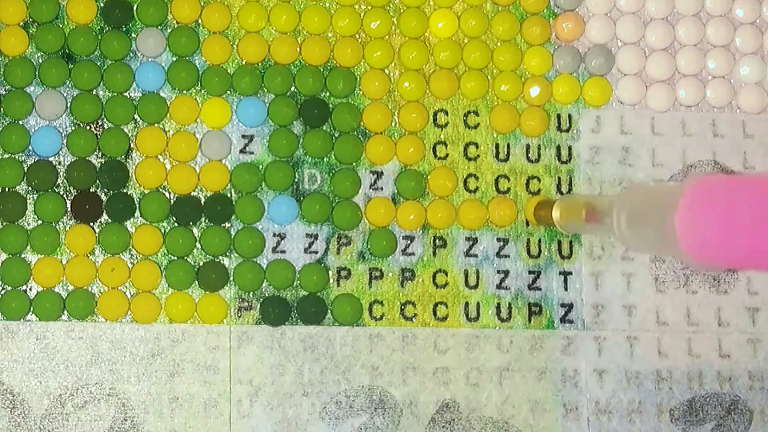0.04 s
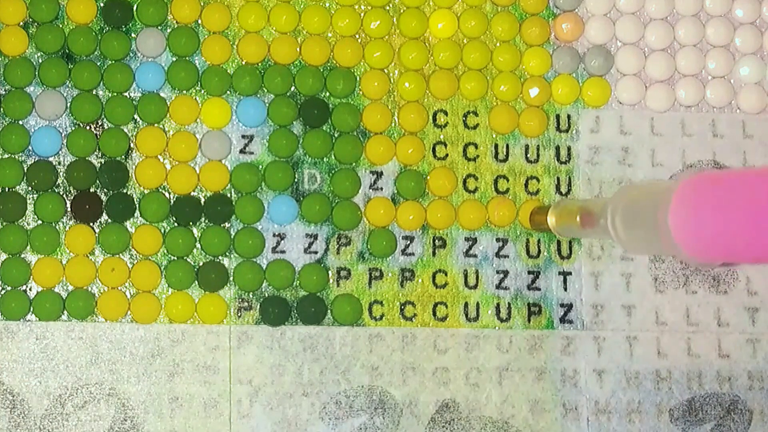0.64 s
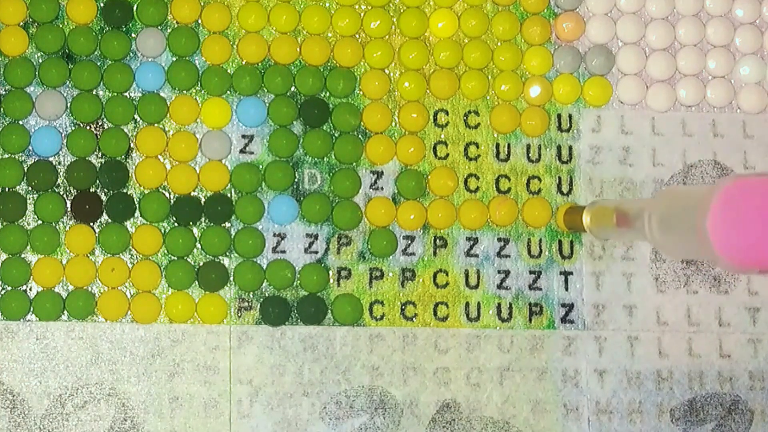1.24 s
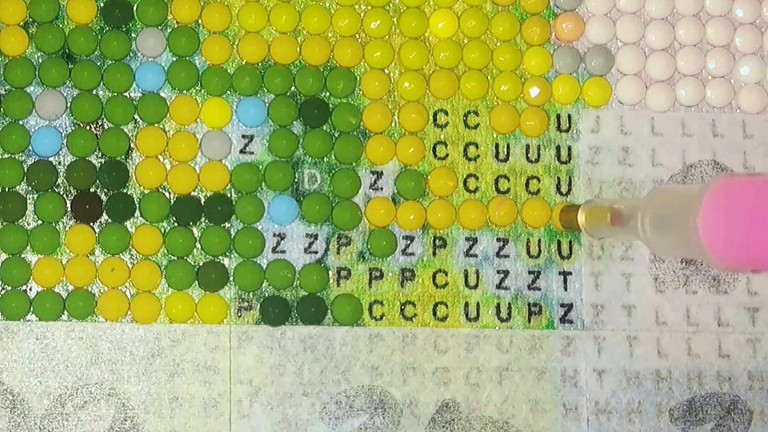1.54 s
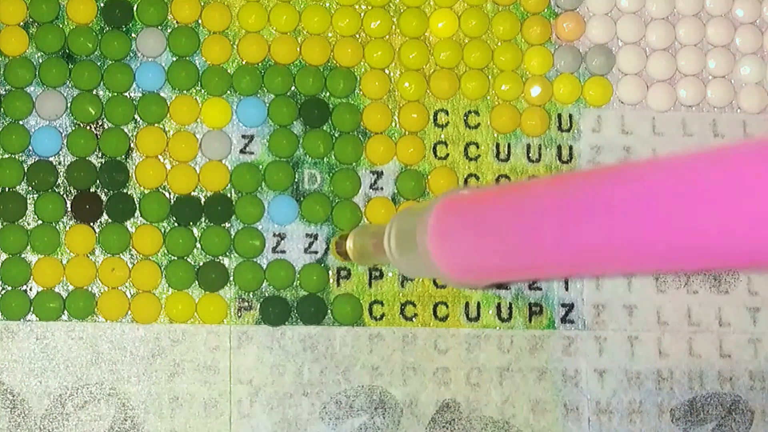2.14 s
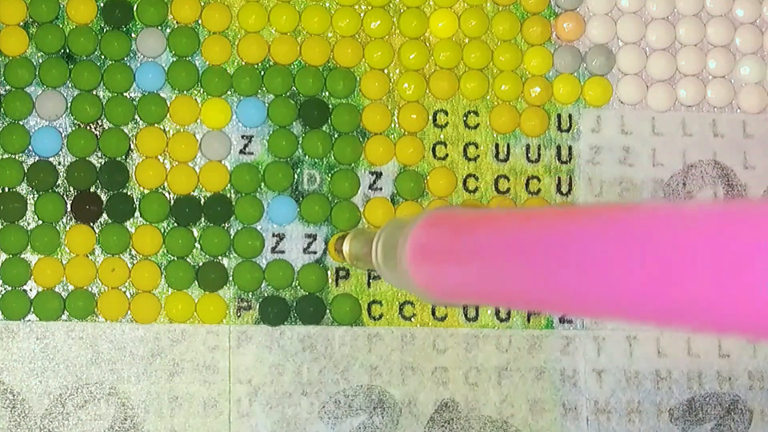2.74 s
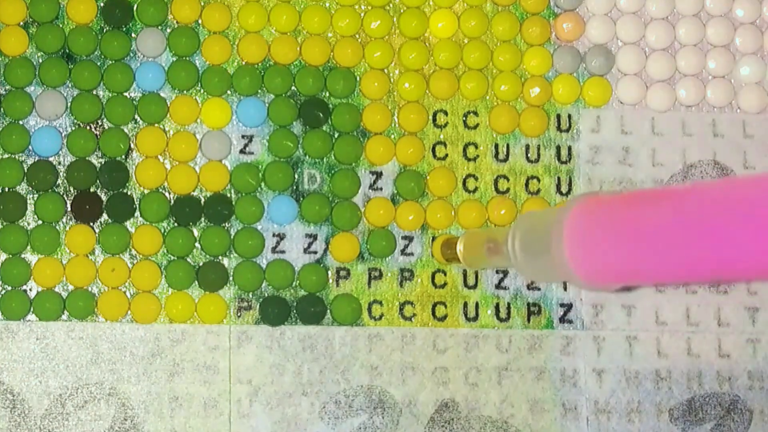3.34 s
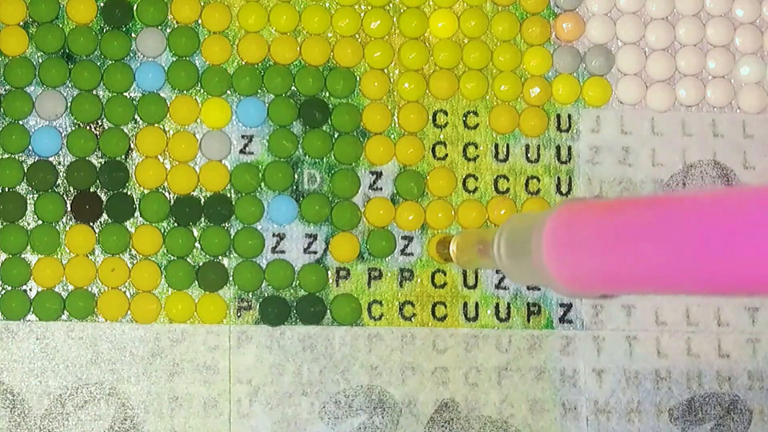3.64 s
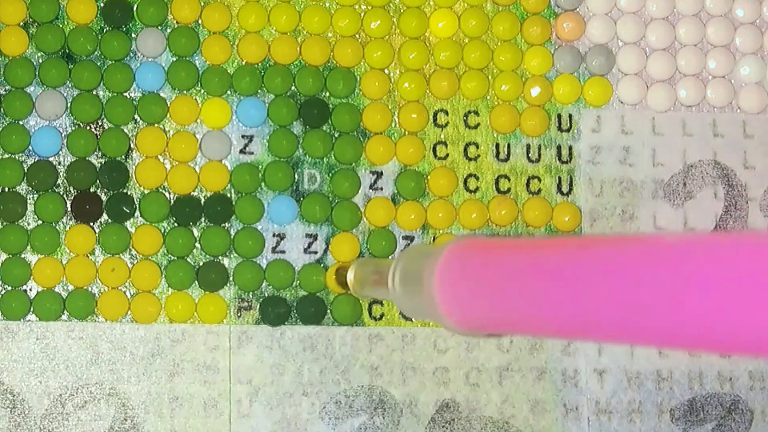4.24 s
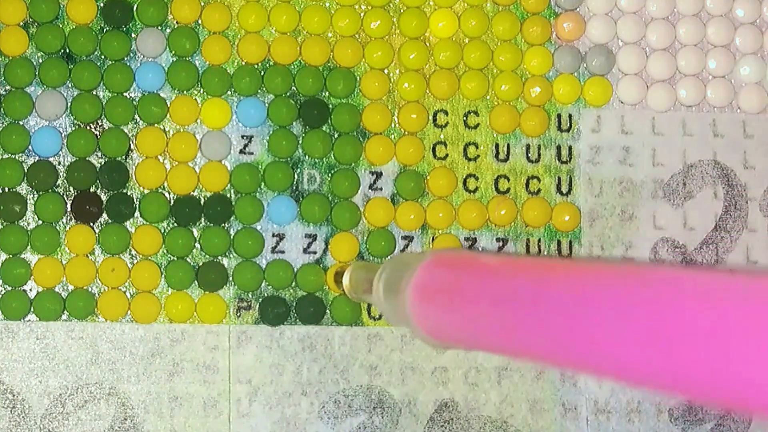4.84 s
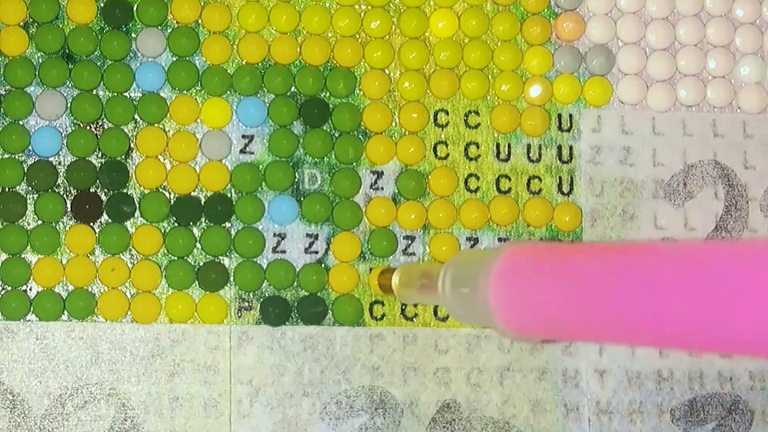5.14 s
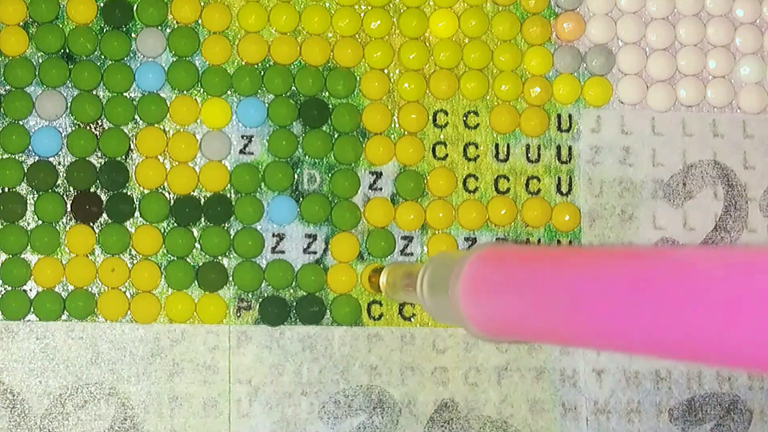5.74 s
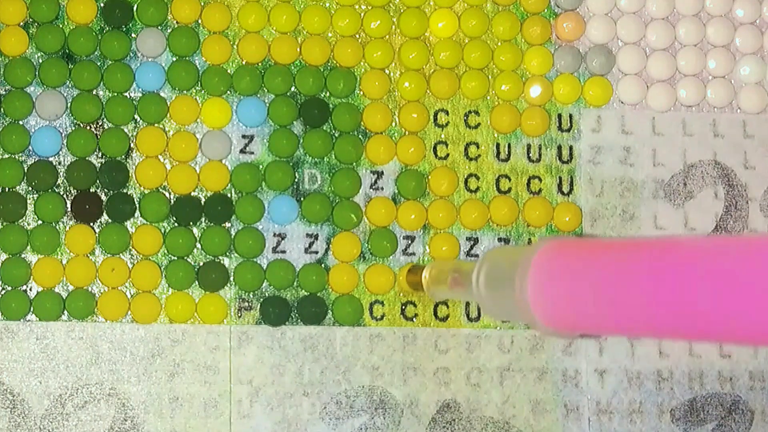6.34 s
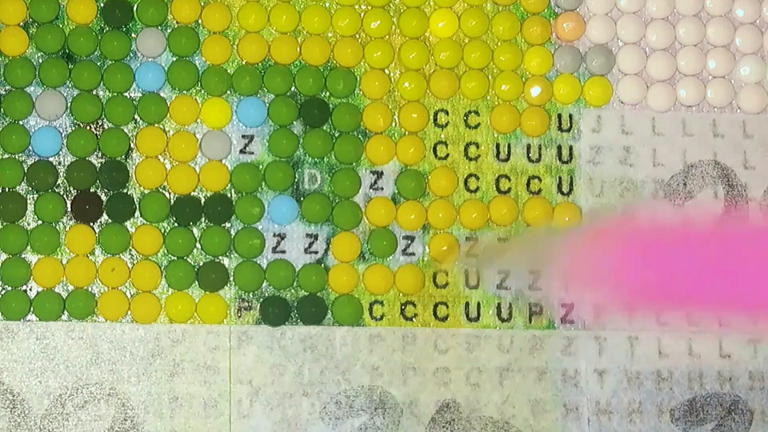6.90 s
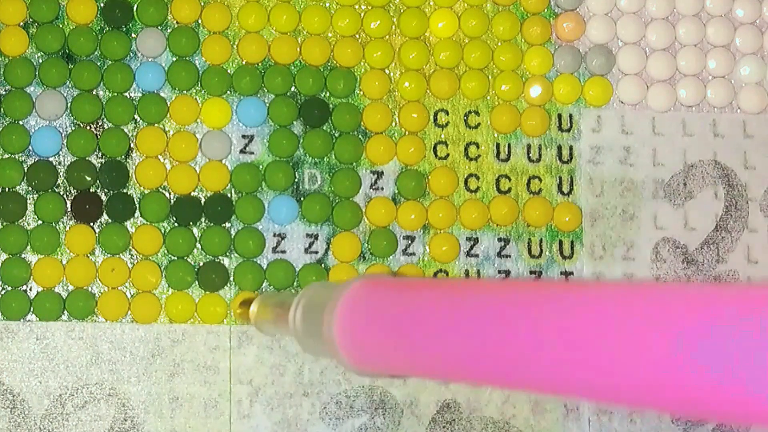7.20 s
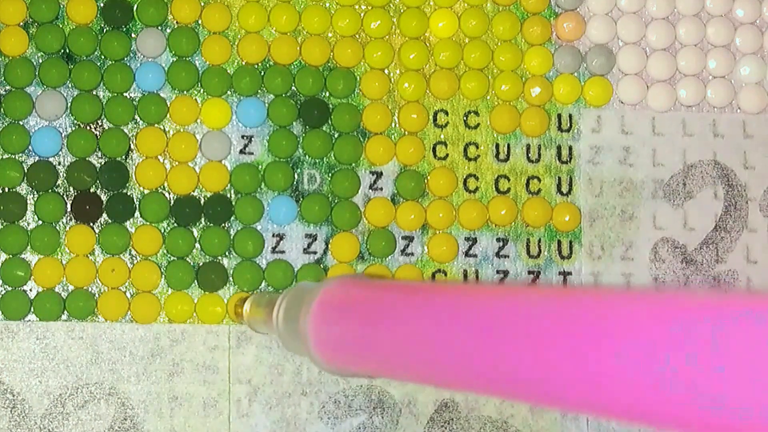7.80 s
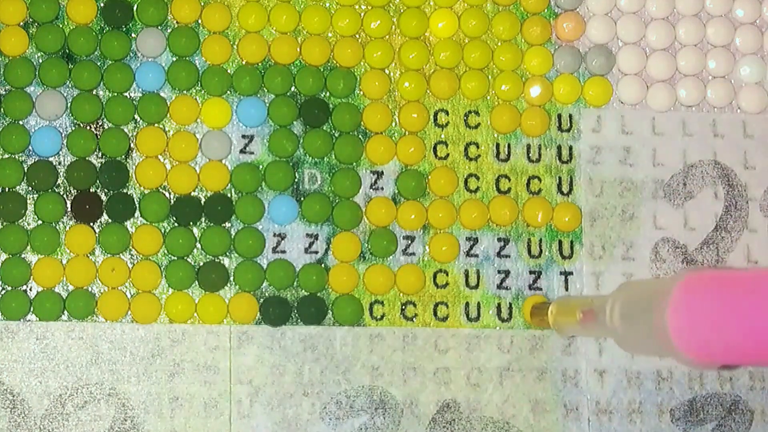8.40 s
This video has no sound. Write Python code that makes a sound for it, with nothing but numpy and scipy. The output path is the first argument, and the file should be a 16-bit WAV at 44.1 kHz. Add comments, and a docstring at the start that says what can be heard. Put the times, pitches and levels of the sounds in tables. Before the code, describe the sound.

Close to the microphone in a small room, a pen presses tiny resin beads onto a sticky canvas. Eight sharp, thin snaps come one a second, from about 0.7 to 7.7 seconds, each ringing very briefly. The first is soft, the second is the loudest, and the last four are firm and even. A hand faintly rubs the canvas around 3 seconds. A small motor whines at a high pitch throughout, over hiss and muffled traffic that swells near 1.6 and 5 seconds. An idling engine throbs outside, loud until 2 seconds, then abruptly much quieter. From 5 seconds a more distant engine hums low, fading near the end at about 8.5 seconds. The background steps in level several times, with soft pops near 1, 2 and 6 seconds, and swells around 7 seconds. Very faint far-off squeals and drones come and go.

```python
"""Sharp little snaps, one a second, sound close by in a small room: a pen presses tiny resin beads onto
a sticky canvas, and each rings briefly as it seats. A small motor whines near 3 kHz over hiss and the
muffled sound of passing traffic. The scene jumps between short shots, each with its own background level:
an engine throbs outside, loudly in the first two, and a more distant one hums through the last ones."""
import sys
import numpy as np
from scipy import signal
from scipy.fft import rfft, irfft
from scipy.io import wavfile

SR = 44100
rng = np.random.default_rng(int(sys.argv[2]) if len(sys.argv) > 2 else 0)


def dump(signal):
    """Clip the signal to [-1, 1] and save it as 16-bit WAV at the path in sys.argv[1]."""
    limited = np.clip(np.atleast_2d(signal).T, -1, 1)
    pcm = np.round(limited * 32767).astype(np.int16)
    wavfile.write(sys.argv[1], SR, pcm)


N = 381906
TIME = np.arange(N) / SR

# beads seating: (time [s], level [dB], low modes [dB], main ring [dB], middle modes [dB], bright modes [dB])
BEAD_SNAPS = [(0.6842, -24, 0, 0.5, 7.5, -8), (1.7187, -4, -3, 2.5, 2, -4),
              (2.7099, -17, -6, -6, -0.5, 1.5), (3.7332, -15.5, -7, 0.5, -2.5, 5.5),
              (4.7212, -10, -4, -2.5, -4.5, -2.5), (5.752, -10, 3, -6, -0.5, -0.5),
              (6.7204, -9.5, 4.5, -4.5, 2, 4), (7.7215, -8.5, 5.5, -5.5, -0.5, -1.5)]
# modes that ring in each snap: (frequency [Hz], level [dB], time to decay by 60 dB [s])
SNAP_MODES = [(2320, -23.5, 0.017), (2670, -15.5, 0.018), (3120, 3.5, 0.006), (4080, -13, 0.0085),
              (4680, -12.5, 0.0067), (5250, -14.5, 0.0061), (6600, -10, 0.0038), (7770, -10.5, 0.0048),
              (8900, -16, 0.0036)]
# dips where the modes cancel: (frequency [Hz], width [Hz])
ANTIRESONANCES = [(1540, 320), (3750, 180)]
# the hand on the canvas: (time [s], level [dB], centre frequency [Hz], time constant [s])
CANVAS_TOUCHES = [(1.737, -41, 8500, 0.00076), (2.782, -55, 2600, 0.02), (2.847, -62, 7500, 0.013),
                  (2.965, -57, 2230, 0.022), (3.08, -61, 4500, 0.017), (3.074, -64, 8000, 0.014),
                  (7.082, -45, 3300, 0.0021)]
# the motor's tone and sidebands: (offset from the tone [multiples of the turn rate], level [dB])
MOTOR_SIDEBANDS = [(-5, -23), (-3, -19), (-2, -11), (-1, -3), (0, 0), (1, -5), (2, -11), (3, -13), (4, -17),
                   (5, -18)]
# stretches of the near engine: (start [s], end [s], boom [dB], initial overtones [dB], their rise [dB/s])
ENGINE_STRETCHES = [(0, 0.984, -29, -39, 8), (0.986, 1.996, -29, -32.5, 1.3),
                    (1.993, 5.052, -54.5, -61.5, 1)]
# its harmonics before and after the first jump: (order [multiple of the cycle rate], level [dB])
EARLY_ORDERS = [(1, -25), (2, -34), (3, -38), (4, -12), (5, 1), (6, 2.5), (7, -11), (8, -16), (9, -16.5),
                (10, -12.5), (11, -10.5), (12, -6.5), (13, -32), (14, -22.5), (15, -30), (16, -23.5),
                (17, -17.5), (18, -22.5), (19, -29), (20, -28.5)]
LATE_ORDERS = [(1, -41), (2, -32), (3, -33), (4, -13.5), (5, -1), (6, -0.5), (7, -6.5), (8, -4), (9, 0),
               (10, -6), (11, -4.5), (12, -3.5), (13, -10), (14, -29), (15, -20.5), (16, -36), (17, -18),
               (18, -13.5), (19, -33), (20, -23.5)]
# combustion noise between the orders: (frequency [Hz], spectral density [dB])
COMBUSTION_SPECTRUM = [(10, -12), (45, -8), (100, -3), (220, 0.5), (330, -1.5), (500, -19), (1200, -49),
                       (4000, -70)]
# steady hiss: (frequency [Hz], spectral density [dB])
HISS_SPECTRUM = [(600, -9.5), (1500, -4), (2400, -6.5), (2800, 0), (3130, 9), (3500, -1), (4300, -9),
                 (5250, -7), (5900, -12.5), (7150, 2.5), (7700, -2), (8300, 0), (9700, -16.5), (12000, -19),
                 (15500, -19)]
# tyre noise: (frequency [Hz], spectral density [dB])
TYRE_SPECTRUM = [(100, 4.5), (250, -3), (400, 5.5), (700, 2.5), (1100, -4), (1800, -10.5), (3500, -13.5),
                 (8000, -38)]
# rumble through the walls: (frequency [Hz], spectral density [dB])
RUMBLE_SPECTRUM = [(10, -26), (25, -20), (45, -42), (70, -12.5), (110, -0.5), (170, 2), (230, -6.5),
                   (330, -9.5), (600, -22.5), (1500, -56)]
# vehicles: (time of closest approach [s], time to fall by 3 dB [s], level over the steady traffic [dB])
VEHICLE_PASSES = [(1.62, 0.27, 6), (5.15, 0.96, 6.5)]
# far squeals and drones: (start [s], duration [s], frequency [Hz], level [dB])
FAR_TONES = [(2.8, 1.35, 183, -53.5), (4.0, .45, 810, -67), (5.06, .35, 585, -58), (5.55, .45, 266, -51),
             (6.08, .9, 468, -61), (6.38, .42, 1705, -63), (8.45, .13, 1950, -70)]
# soft pops on some jumps between shots: (time [s], level [dB], time constant [s])
JUMP_POPS = [(0.9883, -23, 0.00051), (1.996, -29, 0.00089), (6.05, -35.5, 0.00023)]
# background level of each shot: (start [s], level [dB])
SHOT_LEVELS = [(0, -0.5), (1.996, -8), (3.02, -6.5), (5.058, -2), (6.055, -8)]


def bead_snaps(low_hz=1400, high_hz=9300):
    """Free vibration: a bead slips past its neighbours and rings; how it seats weights its damped modes."""
    out, t = np.zeros(N), np.arange(2048) / SR
    hz, db, t60 = np.transpose(SNAP_MODES)
    decays = np.exp(-np.log(1000) * np.outer(1 / t60, t))
    tunings = 1 + .015 * rng.standard_normal((len(BEAD_SNAPS), len(hz)))
    scrapes = rng.standard_normal((len(BEAD_SNAPS), len(t)))
    family = np.digitize(hz, [2800, 3600, 5900])  # low, main, middle, bright
    # the snap is thin, with little bass and a steep roll-off above 9 kHz
    bass_cut = signal.butter(4, low_hz, "high", fs=SR, output="sos")
    top_cut = signal.butter(8, min(high_hz, 15000), fs=SR, output="sos")
    # the canvas and the table under it answer with a faint thud
    thud = sum(undb(gain_db) * np.sin(2 * np.pi * mode_hz * t) * np.exp(-t / decay_s)
               for mode_hz, gain_db, decay_s in
               [(324, -20.5, 0.0029), (517, -30.5, 0.0033), (1090, -16.5, 0.00035)])
    for (s, level_db, *family_db), tuning, scrape in zip(BEAD_SNAPS, tunings, scrapes):
        gains = undb(db + np.array(family_db)[family])
        ring = gains @ (np.sin(2 * np.pi * np.outer(hz * tuning, t)) * decays)
        crack = undb(family_db[-1] - 12) * scrape * np.exp(-t / 0.0019)
        tick = signal.sosfilt(top_cut, signal.sosfilt(bass_cut, ring + crack))
        snap = tick + undb(-17) * crack + undb(0.25 * family_db[0]) * thud
        for dip_hz, width_hz in ANTIRESONANCES:
            snap = signal.lfilter(*signal.iirnotch(dip_hz, dip_hz / width_hz, fs=SR), snap)
        add(out, s, undb(level_db) * snap)
    return out


def canvas_rustle():
    """Friction noise: the hand rubs the canvas in short, band-limited bursts."""
    out, t = np.zeros(N), np.arange(8192) / SR
    for s, db, hz, peak_s in CANVAS_TOUCHES:
        rub = unit(bandpass(rng.standard_normal(len(t)), hz / 1.33, hz * 1.57))
        envelope = t / peak_s * np.exp(1 - t / peak_s)
        add(out, s, undb(db) * rub * envelope)
    return out


def room(x, t60_s=0.48):
    """Reverberation: early reflections from the nearest wall, and an exponentially decaying diffuse field."""
    t = np.arange(SR // 2) / SR
    echo_age = np.maximum(t - .011, 0)
    reflections = bandpass(rng.standard_normal(len(t)), 890, 6200)
    early = unit(reflections * (echo_age > 0) * np.exp(-echo_age / 0.003))
    diffuse = bandpass(rng.standard_normal(len(t)), 400, 8400)
    tail = unit(diffuse * (t > .003) * np.exp(-np.log(1000) * t / t60_s))
    response = (undb(-22) * early + undb(-19.5) * tail) / np.sqrt(len(t))
    return signal.fftconvolve(x, response)[:N]


def motor(tone_hz=3106, turn_hz=135.3, twin_offset_hz=21, level_db=-45.5):
    """Modulation: a tone chopped once a turn gains sidebands; a weaker twin beats against it."""
    turns = np.cumsum(turn_hz * (1 + .002 * walk(2.6))) / SR
    chopping = 0
    for offset, db in MOTOR_SIDEBANDS:
        flutter = 1 + 0.37 * (walk(20) + 1j * walk(39))
        chopping += undb(db) * flutter * np.exp(2j * np.pi * (offset * turns + rng.random()))
    tone = np.exp(2j * np.pi * np.cumsum(tone_hz + 4 * walk(21.4)) / SR)
    twin = undb(-9) * np.exp(2j * np.pi * np.cumsum(tone_hz + twin_offset_hz + 12 * walk(20.6)) / SR)
    return unit(np.real(chopping * (tone + twin))) * undb(level_db + walk(5.7))


def near_engine(cycle_hz=17.9, jump_s=.988):
    """Beating: an idling engine's adjacent orders boom through the walls and throb at the cycle rate."""
    cycles = np.cumsum(cycle_hz * (1 + 0.00474 * walk(3.43))) / SR
    boom_gain, overtone_gain = engine_gains()
    out = 0
    for orders, on in [(EARLY_ORDERS, TIME < jump_s), (LATE_ORDERS, TIME >= jump_s)]:
        partials = []
        for order, db in orders:
            gain = undb(db + 0.21 * order * walk(3.5))  # higher orders waver more
            phase = 2 * np.pi * (order * cycles + rng.random() + 0.089 * walk(3.2))
            partials.append(gain * np.sin(phase))
        boom = unit(sum(partials[:7])) * boom_gain * undb(0.73 * walk(3.6))
        overtones = unit(sum(partials[7:])) * overtone_gain
        out += on * (boom + overtones)
    combustion = colour(rng.standard_normal(N), COMBUSTION_SPECTRUM, (100, 260))
    return out + undb(-15) * combustion * overtone_gain


def engine_gains():
    """Amplitude envelopes: in each stretch the boom holds while the overtones grow exponentially."""
    boom, overtones = np.zeros(N), np.zeros(N)
    for start, end, boom_db, overtones_db, rise in ENGINE_STRETCHES:
        on = (TIME >= start) & (TIME < end)
        boom[on] = undb(boom_db)
        overtones[on] = undb(overtones_db + rise * (TIME[on] - start))
    return boom, overtones


def distant_engine(firing_hz=64.5, level_db=-43, start_s=5.02, attack_s=0.11, fade_from_s=7.38):
    """Transmission loss: little but the firing note gets in; it rises, holds and dies away."""
    phase = 2 * np.pi * np.cumsum(firing_hz * (1 + 0.007 * walk(4.9))) / SR
    note = unit(np.sin(phase) + undb(-32) * np.sin(2 * phase))
    attack = 1 - np.exp(-np.maximum(TIME - start_s, 0) / attack_s)
    fade_db = -6.5 * np.maximum(TIME - fade_from_s, 0)
    return note * attack * undb(level_db + fade_db + 1.2 * walk(3.9))


def hiss(level_db=-53):
    """Coloured noise: broadband hiss peaks near 3.1 kHz, with two thin beating overtones above."""
    noise = colour(rng.standard_normal(N), HISS_SPECTRUM, (6600, 8800)) * undb(.5 * walk(35))
    overtones = 0
    for hz, db in [(7005, -11.5), (7335, -7.5)]:
        beat = 1 + 1.2 * np.sin(2 * np.pi * np.cumsum(9 + 1.28 * walk(4.5)) / SR)
        overtones += undb(db) * beat * np.sin(2 * np.pi * np.cumsum(hz + 16 * walk(42)) / SR)
    return (noise + overtones) * undb(level_db)


def traffic(tyre_db=-59, rumble_db=-50.5):
    """Directivity: exhausts point backwards, so rumble peaks after tyre noise; the walls dull both."""
    tyres = colour(rng.standard_normal(N), TYRE_SPECTRUM, (450, 1500)) * undb(tyre_db + 1.4 * walk(13))
    rumble = colour(rng.standard_normal(N), RUMBLE_SPECTRUM, (100, 260))
    rumble *= undb(rumble_db + 0.64 * walk(4.2))
    return tyres * passing_gain(lag_s=0) + rumble * passing_gain(lag_s=0.2)


def passing_gain(lag_s):
    """Inverse-square law: each vehicle adds power to the steady flow according to its distance."""
    power = sum(undb(db) ** 2 / (1 + ((TIME - s - lag_s) / width) ** 2) for s, width, db in VEHICLE_PASSES)
    return np.sqrt(1 + power)


def far_squeals():
    """Random modulation: faint tones waver in pitch and level as they swell and fade."""
    out = np.zeros(N)
    for s, duration, hz, db in FAR_TONES:
        swell = signal.windows.tukey(int(duration * SR), .6)
        phase = 2 * np.pi * np.cumsum(hz * (1 + 0.011 * walk(25))) / SR
        tone = unit(np.sin(phase) * undb(4 * walk(7)))
        add(out, s, undb(db) * tone[:len(swell)] * swell)
    return out


def pops():
    """Bipolar pulses: each pop is one quick swing up and down in pressure."""
    out, t = np.zeros(N), np.arange(-256, 256) / SR
    for s, db, decay_s in JUMP_POPS:
        add(out, s + t[0], -undb(db) * np.tanh(t / .00004) * np.exp(-abs(t) / decay_s))
    return out


def background_gain(swell_s=7.12, width_s=0.93, swell_db=6.5):
    """Common envelope: the background steps in level between shots, and swells once in the last."""
    starts, db = np.transpose(SHOT_LEVELS)
    shot = np.searchsorted(starts[1:], TIME)
    swell = np.exp(-((TIME - swell_s) / width_s) ** 2) * (shot == len(SHOT_LEVELS) - 1)
    return undb(db[shot] + swell_db * swell)


def undb(db):
    """Decibels to amplitude ratio."""
    return 10 ** (np.asarray(db) / 20)


def unit(x):
    """Normalisation to rms 1."""
    return x / np.sqrt(np.mean(x ** 2) + 1e-30)


def walk(rate):
    """Low-passed noise of rms 1, changing about rate times a second."""
    size = 16384
    hz = np.fft.rfftfreq(size, TIME[-1] / size)
    slow = irfft(rfft(rng.standard_normal(size)) * np.exp(-(hz / rate) ** 2))
    return unit(np.interp(TIME, np.linspace(0, TIME[-1], size), slow))


def colour(x, points, band):
    """Spectral shaping, with rms 1 inside the band."""
    hz = np.fft.rfftfreq(N, 1 / SR)
    at, db = np.transpose(points)
    shaped = rfft(x) * undb(np.interp(np.log(hz + 1), np.log(at), db))
    return irfft(shaped, N) / np.std(irfft(shaped * (hz > band[0]) * (hz < band[1]), N))


def bandpass(x, low_hz, high_hz):
    """Gentle causal band-pass."""
    return signal.sosfilt(signal.butter(2, [low_hz, min(high_hz, SR / 2 - 1000)], "band",
                                        fs=SR, output="sos"), x)


def add(out, s, x):
    """Superpose x on out from second s."""
    i = max(int(s * SR), 0)
    out[i:i + len(x)] += x[:max(N - i, 0)]


def scene():
    """Superposition: the beadwork and its reverberation add to the background sounds."""
    beadwork = bead_snaps() + canvas_rustle()
    background = (motor() + hiss() + traffic() + distant_engine()) * background_gain()
    return (beadwork + room(beadwork) + pops() + background + near_engine() + far_squeals())[None]


def record(dry):
    """Clipping and band limiting: the signal is held to full scale, then low-passed at 15.8 kHz."""
    lowpass = signal.ellip(10, .1, 80, 15800, fs=SR, output="sos")
    return signal.sosfilt(lowpass, np.clip(dry, -1, 1))


dry = scene()
out = record(dry)
dump(out)
```